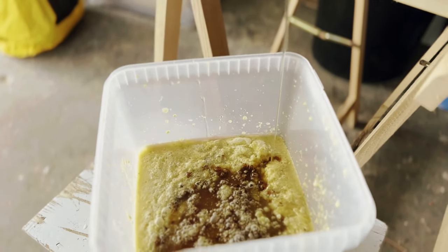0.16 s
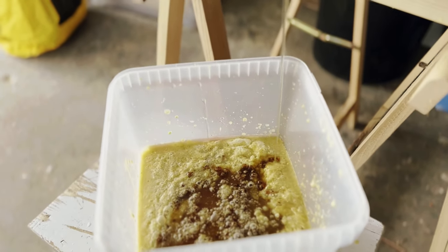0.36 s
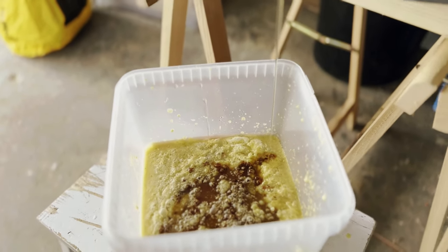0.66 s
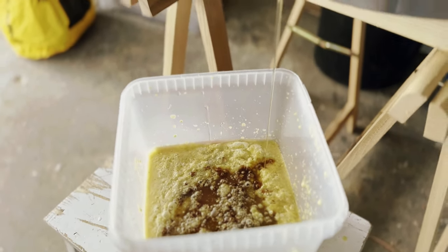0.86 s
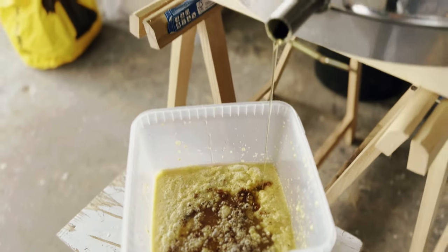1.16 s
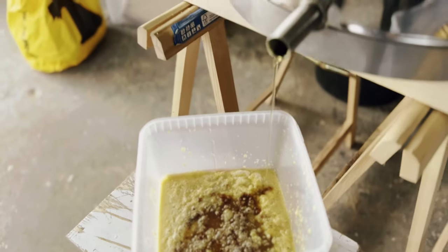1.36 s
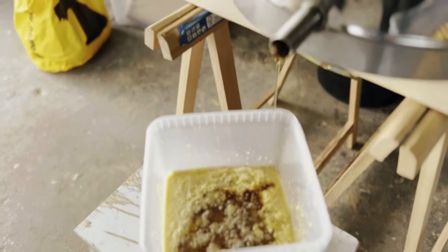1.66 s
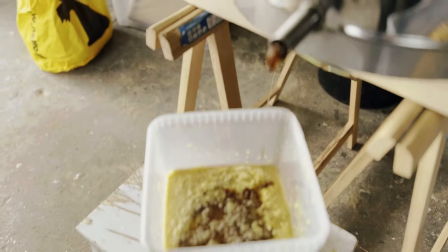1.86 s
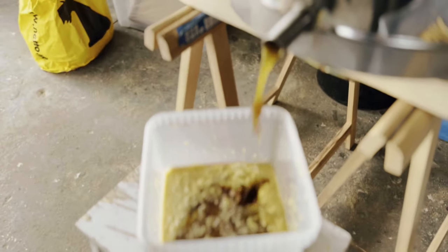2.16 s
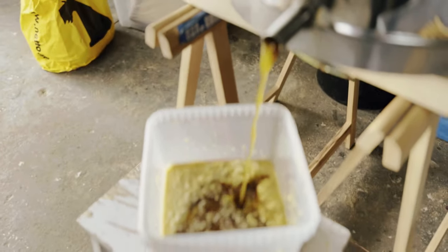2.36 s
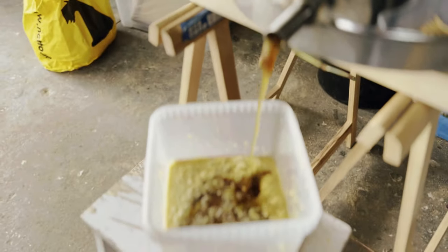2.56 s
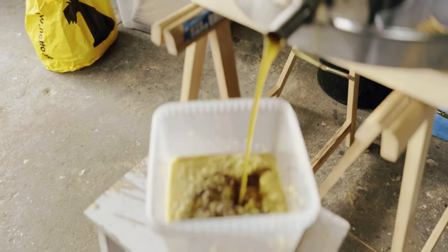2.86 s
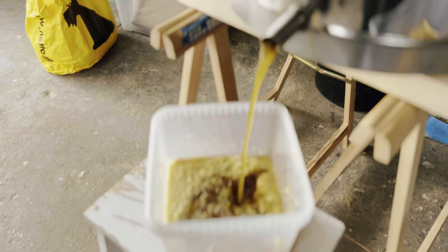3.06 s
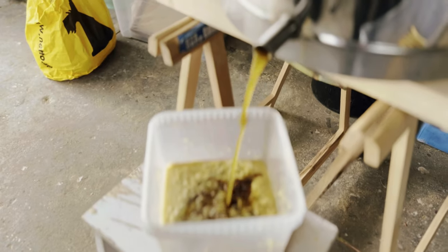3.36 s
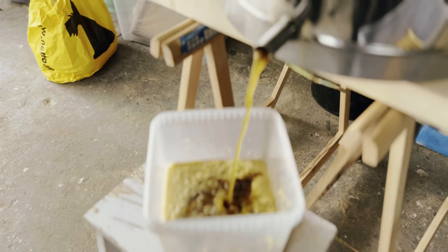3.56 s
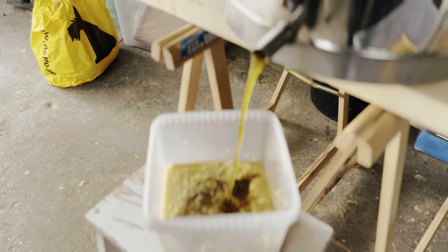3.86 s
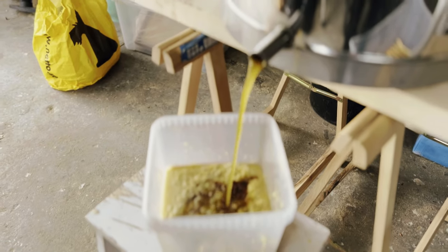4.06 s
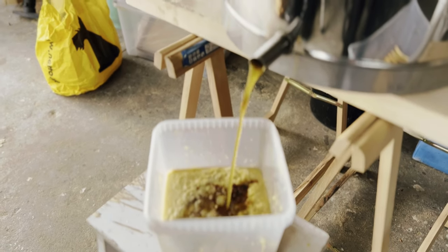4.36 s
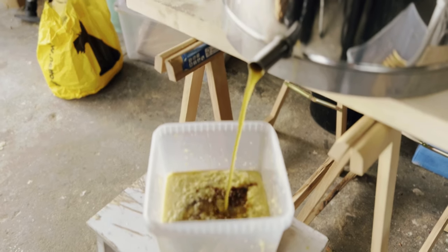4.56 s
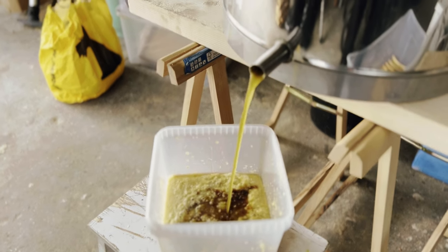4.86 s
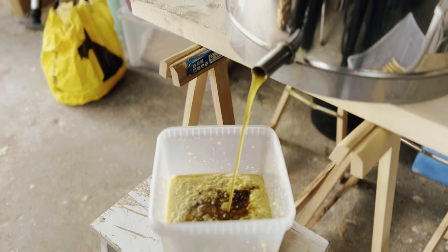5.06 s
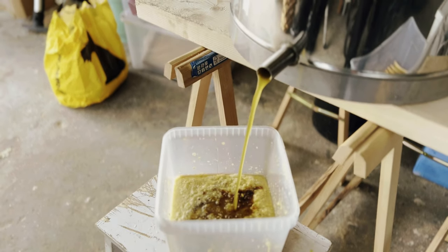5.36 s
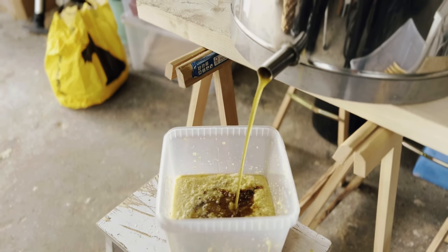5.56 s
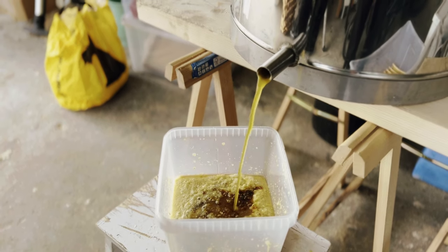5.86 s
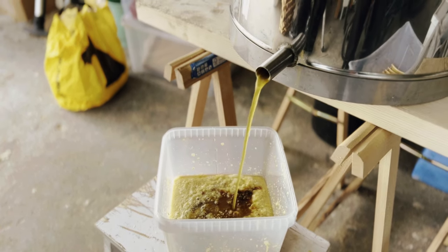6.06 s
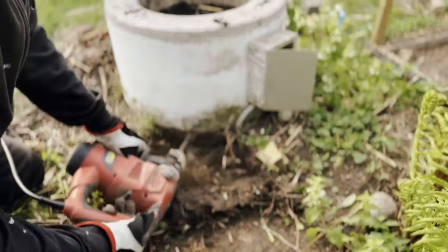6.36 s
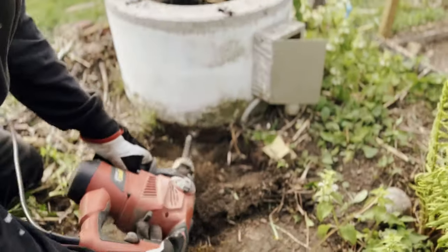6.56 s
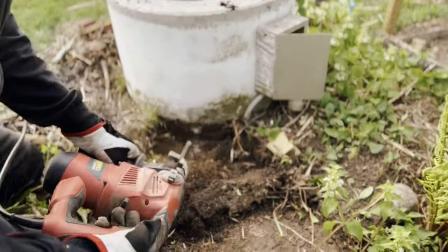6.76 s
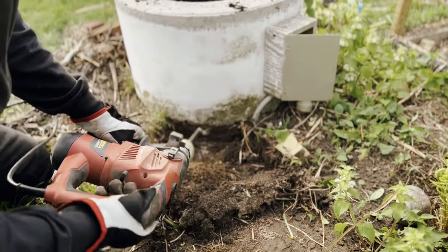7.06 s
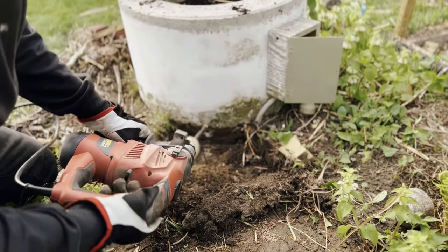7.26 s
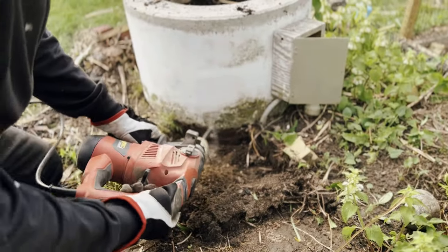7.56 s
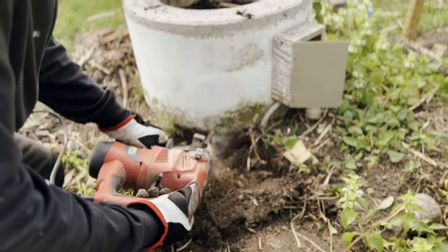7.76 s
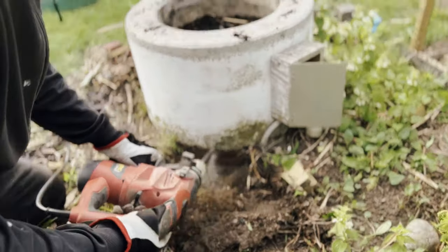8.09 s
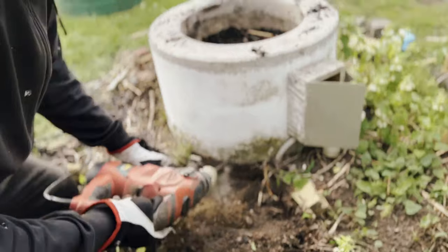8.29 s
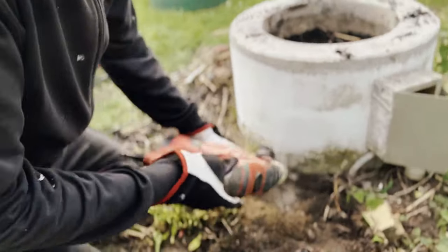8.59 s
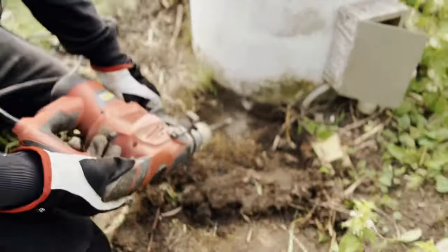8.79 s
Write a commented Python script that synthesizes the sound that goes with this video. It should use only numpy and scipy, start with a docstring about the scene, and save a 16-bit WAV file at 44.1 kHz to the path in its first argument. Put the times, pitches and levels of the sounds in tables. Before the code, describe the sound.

For the first 6.3 seconds a quiet workshop is heard closely, with faint low room air. A sleeve brushes softly at about 0.3 s and fades. A few tiny bubble pops come near 1.1 s; soft, dull low bumps fall between 1.5 and 2.4 s, strongest near 2.1. From about 2.3 s thick honey plops into a plastic tub: irregular hollow gulps, bright snaps, little sprays and fine fizz, with a short squelch at 2.9, busiest until 4.7, then sparser. At 6.33 s an abrupt cut to a garden: a loud electric hammer, already at speed, coasts down with falling whine and rushing air. At 7.4 s it spins up fast; from 7.45 rapid blows thud, clank and ring, starting with one hard bite at 7.5, heaviest near 8, lighter around 8.5. Released at about 8.6 s, hammering drops out and the motor whirs downward.

```python
"""Thick honey runs from a spout into a plastic tub in a quiet workshop: decaying tones for gulps and snaps,
filtered noise for spray, random rung pulses for fizz. A sleeve rustles; soft low bumps over room air.
At 6.33 s, abruptly, a garden: a corded electric hammer coasts down, spins up, chisels at the foot of a
concrete ring for a second and is let go. One shaft speed drives its air noise, hum, whine and blows."""
import sys
import numpy as np
from scipy import signal
from scipy.fft import rfft, irfft, next_fast_len
from scipy.io import wavfile
from scipy.ndimage import uniform_filter1d

SR = 44100
rng = np.random.default_rng(int(sys.argv[2]) if len(sys.argv) > 2 else 0)


def dump_mix(stems):
    """Bounce the given channels to the path in sys.argv[1] as a 16-bit WAV at rate SR."""
    frames = np.atleast_2d(stems).T  # one column per channel
    limited = np.clip(frames, -1, 1)  # hard clip at full scale
    pcm = np.round(limited * 32767).astype(np.int16)
    wavfile.write(sys.argv[1], SR, pcm)


N = 393813
TIME = np.arange(N) / SR
GARDEN_START_S = 6.33
BAND_EDGE_HZ = 15900

# Loudest bursting bubbles. Each row: start in seconds, gulp in Hz, gulp level in dB, snap in Hz,
# snap level in dB, spray level in dB before a common trim.
BUBBLES = [(1.0653, 478, -47.5, 1220, -56, -60), (1.1075, 654, -42.5, 1250, -47.5, -53),
           (1.1465, 667, -44, 1220, -48, -66), (2.0683, 580, -50, 1800, -50.5, -80),
           (2.154, 580, -54, 1250, -50, -50.5), (2.22, 480, -56, 1270, -42.5, -54),
           (2.3396, 400, -63, 1920, -46.5, -42), (2.3607, 590, -34.5, 3970, -48, -50),
           (2.375, 588, -39.5, 3680, -50, -60), (2.4284, 536, -35, 1800, -54, -45),
           (2.4593, 480, -43, 1230, -53, -65), (2.4942, 610, -52, 3830, -35, -58),
           (2.5038, 593, -32.5, 1220, -42, -49), (2.5335, 556, -43, 3640, -54, -66),
           (2.6413, 590, -60, 3730, -38.5, -52), (2.7238, 547, -38, 3870, -67, -55),
           (2.751, 585, -36.5, 2820, -43.5, -46), (2.8041, 775, -35.5, 3000, -39.5, -51),
           (2.8188, 580, -25.5, 1170, -41, -41), (2.837, 460, -39.5, 1320, -56, -51),
           (2.927, 584, -44, 2900, -47, -54), (2.956, 490, -33, 1360, -48, -56),
           (3.0591, 467, -45, 2900, -48, -70), (3.123, 480, -41.5, 1340, -65, -72),
           (3.1761, 474, -39, 4050, -39.5, -46.5), (3.2599, 480, -35.5, 4130, -52, -44.5),
           (3.3026, 500, -45, 5640, -60, -43.5), (3.325, 596, -46, 1750, -46.5, -67),
           (3.344, 493, -40.5, 3970, -40, -48), (3.413, 630, -39.5, 2650, -49.5, -65),
           (3.4795, 605, -31.5, 1190, -47, -42), (3.576, 550, -36.5, 1200, -34.5, -75),
           (3.5974, 470, -57, 5050, -36, -50), (3.701, 503, -32, 5330, -47, -64),
           (3.7405, 580, -42, 2900, -38.5, -62), (3.885, 548, -41, 3070, -62, -60),
           (4.0087, 780, -53, 5340, -41.5, -62), (4.1964, 720, -45, 2540, -45, -73),
           (4.228, 560, -60, 5000, -50, -46), (4.3015, 497, -43.5, 5450, -38.5, -47),
           (4.4531, 500, -38.5, 5740, -34.5, -40.5), (4.519, 550, -51, 4000, -45.5, -53),
           (4.5568, 620, -40.5, 6400, -38.5, -45), (4.6904, 720, -38.5, 2920, -47, -42),
           (4.7151, 497, -52, 2900, -44.5, -64), (4.8596, 580, -43, 1780, -42.5, -80),
           (5.2476, 480, -60, 3860, -47, -56), (5.302, 606, -40.5, 4150, -40.5, -55),
           (5.4303, 582, -37, 4020, -49, -47.5), (5.8494, 576, -43, 3830, -44, -48.5),
           (5.9535, 470, -43.5, 6340, -37, -47.5), (6.0117, 484, -38.5, 5270, -45, -68),
           (6.158, 463, -44.5, 4000, -47.5, -58), (6.289, 570, -36.5, 1305, -65, -70)]
# Liveliness of the stream. Each row: time in seconds, level of the tiny bursts in dB.
FIZZ_LEVEL = [(0.3, -80), (0.8, -68), (2.15, -68.5), (2.4, -54), (3.1, -60.5), (4.65, -59.5), (5.0, -71),
              (5.7, -71.5), (5.95, -61), (6.3, -68)]
# Colour of a bursting film. Each row: frequency in Hz, relative level in dB.
SPRAY_COLOUR = [(300, -16), (1200, -6), (3000, 1.5), (6500, 1.5), (8000, -2.5), (10500, 7.5), (12500, -3),
                (15000, -3), (16500, 17)]
# Short squelch of froth: centre in seconds, half-length in seconds, level in dB.
SQUELCH = (2.905, 0.035, -42.5)
# Colour of the froth. Each row: frequency in Hz, relative level in dB.
FROTH_COLOUR = [(250, -15), (550, 2), (950, -6), (1500, -14), (3000, -8), (5000, -14), (12000, -26)]

# Driven stretches of the motor. Each row: start in seconds (the first is already at top speed),
# release in seconds, top speed in shaft turns per second.
DRIVEN_STRETCHES = [(6.33, 6.378, 416.5), (7.4, 8.593, 401)]
# Motor time constants; fan drag relative to bearing friction; reference speed.
SPIN_UP_S, COAST_S, FAN_DRAG = 0.161, 1.389, 0.36
FULL_TURNS_PER_S = 400
# First colour of the rush. Each row: frequency in Hz, relative level in dB per Hz.
FIRST_RUSH_COLOUR = [(40, -28), (90, -11.5), (220, -19.5), (440, -3.5), (830, -7), (1200, -8), (2100, -9),
                     (2700, -4.5), (3800, -8), (5300, -4), (7400, -5), (10400, -8), (12000, -10.5),
                     (16000, -15)]
# Fuller colour of the rush. Each row: frequency in Hz, relative level in dB per Hz.
FULLER_RUSH_COLOUR = [(40, -27), (100, -12), (250, -2.5), (450, 0), (950, 1), (1300, 3.5), (2200, -4.5),
                      (3000, 2), (4300, -1), (6300, -1), (8000, -2.5), (10000, -3), (12000, -9),
                      (16000, -17)]
# Housing resonances. Each row: frequency in Hz, width in Hz, lift in dB.
HOUSING_MODES = [(1250, 300, 4.5), (1804, 190, 6), (2900, 1050, 5), (4970, 1000, 2.5), (6480, 470, 3),
                 (7180, 370, -3)]
# The arm passes in front of the tool and shades its rush. Each row: time in seconds, gain in dB.
ARM_SHADE = [(8.27, 0), (8.47, -2.5), (8.68, -3), (8.78, 0.4)]
# Fan whine apart from its rise with speed. Each row: time in seconds, relative level in dB.
WHINE_LEVEL = [(6.55, 0), (6.63, -8), (6.76, 1), (6.84, -13), (6.91, 0), (7.5, -8.5), (7.57, -14),
               (7.63, -1.5), (8.0, 4), (8.11, 2), (8.14, -7), (8.46, -4), (8.52, -18.5), (8.62, -5)]
# Striker: engages in seconds, drops out in seconds.
HAMMER_SPAN_S = (7.44, 8.665)
# How hard the chisel is pressed home. Each row: time in seconds, pressure from 0 to 1.
CHISEL_PRESSURE = [(7.44, 0.46), (7.7, 0.62), (7.8, 0.84), (7.97, 0.95), (8.08, 0.45), (8.35, 0.57),
                   (8.5, 0), (8.62, 0), (8.75, 0.4)]
# Colour of the thud. Each row: frequency in Hz, relative level in dB.
THUD_COLOUR = [(30, -28), (115, -11.5), (230, 0), (330, -7.5), (450, 11), (520, 8), (580, 2), (680, 6),
               (740, -1.5), (795, 6), (880, -3), (1300, -13), (3000, -24), (8000, -29)]
# Steel on steel inside the tool. Each row: frequency in Hz, relative level in dB.
CLANK_COLOUR = [(300, -21), (900, -4.5), (1500, -6), (2200, 0), (3000, 5), (4200, 0.5), (6400, 2.5),
                (9000, -7), (16000, -2.5)]
# Modes of the chisel steel. Each row: frequency in Hz, width in Hz, relative level in dB.
CHISEL_MODES = [(13400, 400, 0), (14000, 900, -15), (10400, 1100, -5)]
# Body shake at 1 to 5 times the blow rate: relative levels in dB.
SHAKE_HARMONICS_DB = [-8.5, -4, -2, -2, -5]
# One hard blow as the chisel seats.
BITE_S, BITE_DB, BITE_DECAY_S = 7.516, -10.5, 0.0023

# Sleeve brush: start in seconds, attack in seconds, decay in seconds, level in dB.
SLEEVE = (0.33, 0.06, 0.35, -62)
# Colour of the cloth. Each row: frequency in Hz, relative level in dB.
CLOTH_COLOUR = [(500, -14), (2500, -5), (4000, 2.5), (6500, 1), (9000, -3), (11000, -22), (16000, -28)]
# Workshop reverberation. Each row: frequency in Hz, 60 dB decay time in seconds.
ROOM_T60 = [(200, 0.37), (600, 0.23), (2500, 0.13), (6000, 0.22), (9000, 0.15), (15000, 0.23)]
# Soft low bumps. Each row: centre in seconds, level in dB, Gaussian width in seconds.
BUMPS = [(1.522, -50, 0.039), (1.836, -46.5, .04), (1.93, -58, .04), (2.07, -36.5, 0.012),
         (2.16, -47, 0.044), (2.317, -42, 0.023), (2.395, -50, .03)]
# Colour of the bumps. Each row: frequency in Hz, relative level in dB.
BUMP_COLOUR = [(20, -12), (45, 4), (100, 1), (170, -11), (300, -34), (1000, -73)]
# Colour of the room air. Each row: frequency in Hz, relative level in dB.
AIR_COLOUR = [(15, -43), (28, -20), (58, 2), (92, -11.5), (157, -6.5), (250, -4.5), (400, -14), (900, -13),
              (2500, -29.5), (4200, -36), (6400, -32), (8000, -47), (11000, -56), (16000, -59)]
AIR_DB = -50.5


def amp(db):
    """Decibels to gain."""
    return 10 ** (np.asarray(db) / 20)


def unit(x):
    """Scales to rms 1."""
    return x / np.sqrt(np.mean(x ** 2) + 1e-20)


def read(points, hz):
    """Interpolates a spectrum table on a log-frequency axis."""
    f, value = np.transpose(points)
    return np.interp(np.log(hz + 1), np.log(f + 1), value)


def curve(rows):
    """Interpolates a two-column time table at every sample."""
    s, value = np.transpose(rows)
    return np.interp(TIME, s, value)


def add(mix, s, sound):
    """Mixes a sound in at time s."""
    part = mix[max(round(s * SR), 0):][:len(sound)]
    part += sound[:len(part)]


def shaped_noise(gain_at):
    """Gaussian noise with gain_at(Hz) as its spectrum, rms 1."""
    size = next_fast_len(N)
    spectrum = rfft(rng.standard_normal(size))
    spectrum *= gain_at(np.fft.rfftfreq(size, 1 / SR))
    return unit(irfft(spectrum, size)[:N])


def noise(colour):
    """Steady noise with a spectrum table, rms 1."""
    return shaped_noise(lambda hz: amp(read(colour, hz)))


def wander(limit_hz):
    """Slow random drift up to about limit_hz, rms 1."""
    return shaped_noise(lambda hz: 1 / (1 + (hz / limit_hz) ** 2))


def tint(x, colour, size=4096):
    """Minimum-phase filter with a spectrum table: attacks stay sharp."""
    log_gain = np.log(amp(read(colour, abs(np.fft.fftfreq(size, 1 / SR)))))
    response = np.exp(np.conj(signal.hilbert(log_gain)))
    taps = np.fft.ifft(response).real[:size // 2]
    return signal.oaconvolve(x, taps)[:N]


def ring(x, hz, width_hz):
    """One damped mode that keeps the power of a white input."""
    r = np.exp(-np.pi * width_hz / SR)
    pole = r * np.exp(2j * np.pi * hz / SR)
    return signal.lfilter([np.sqrt(2 * (1 - r * r))], [1, -pole], x).real


def bubbles(gulp_s=0.0074, rise_s=0.00042, sag=0.099, snap_s=0.003, chirp=0.21,
            spray_s=0.0027, grit=0.71, tear_s=0.0005, spray_trim_db=-1):
    """Each film bursts with a spray and a rising snap; the air pocket under it rings, sagging in pitch."""
    t = np.arange(SR // 12) / SR
    tones, spray = np.zeros(N), np.zeros(N)

    def sized(v, db):  # rms level over the first 10 ms
        return amp(db) * v / np.sqrt(np.mean(v[:SR // 100] ** 2))

    gulp_decay, snap_decay = np.exp(-t / gulp_s), np.exp(-t / snap_s)
    gulp_rise, tear = 1 - np.exp(-t / rise_s), 1 - np.exp(-t / tear_s)
    spray_decay = np.exp(-t / spray_s) + 0.07 * np.exp(-t / 0.011)
    for s, gulp_hz, gulp_db, snap_hz, snap_db, spray_db in BUBBLES:
        film, drops = rng.standard_normal((2, len(t)))
        gulp_turns = np.cumsum(gulp_hz * (1 + sag * (2 * gulp_decay - 1))) / SR
        gulp = np.sin(2 * np.pi * gulp_turns) * gulp_decay * gulp_rise
        snap_turns = np.cumsum(snap_hz * (1 + chirp * (.5 - snap_decay))) / SR  # the hole widens
        gritty = grit * ring(film, snap_hz, 0.34 * snap_hz)
        snap = tear * snap_decay * (np.sin(2 * np.pi * snap_turns) + gritty)
        add(tones, s, sized(gulp, gulp_db) + sized(snap, snap_db))
        add(spray, s, sized(tear * drops * spray_decay, spray_db + spray_trim_db))
    tone_colour = [(100, -13), (350, 0.0), (6800, -2.0), (9000, -46), (16000, -24)]
    return tint(tones, tone_colour) + tint(spray, SPRAY_COLOUR)


def fizz(ticks_per_s=130, spread_db=6.0, gulps_per_s=30, gulps_db=4, pitches=14):
    """Small bubbles ring at random pitches, as loud as the stream is lively; once the froth squelches."""
    def bursts(per_s, lo_hz, hi_hz, damping):
        size = amp(spread_db * np.minimum(rng.exponential(1, N), 3))
        size *= rng.random(N) < per_s / SR
        kind = rng.integers(0, pitches, N)
        bank = enumerate(np.geomspace(lo_hz, hi_hz, pitches))
        return unit(sum(ring(size * (kind == k), hz, damping * hz) for k, hz in bank))

    gulp_colour = [(150, 3), (400, 3), (900, 3), (2500, -7.5)]
    gulps = tint(bursts(gulps_per_s, 456, 754, 0.093), gulp_colour)
    ticks = unit(tint(bursts(ticks_per_s, 1800, 10000, .13), SPRAY_COLOUR))
    centre_s, half_s, squelch_db = SQUELCH
    swell = np.exp(-((TIME - centre_s) / half_s) ** 4)
    squelch = amp(squelch_db) * swell * unit(tint(bursts(900, 590, 4550, 0.076), FROTH_COLOUR))
    return amp(curve(FIZZ_LEVEL)) * (ticks + amp(gulps_db) * gulps) + squelch


def shaft_speed():
    """Turns per second: torque falls as the motor gains speed; released, friction and the fan brake it."""
    speed = np.full(N, float(DRIVEN_STRETCHES[0][2]))
    for start_s, release_s, top in DRIVEN_STRETCHES:
        on, off = round(start_s * SR), round(release_s * SR)
        lag = np.exp(-TIME[:N - on] / SPIN_UP_S)
        speed[on:] = np.cbrt(top ** 3 + (speed[on] ** 3 - top ** 3) * lag)
        left = np.exp(-TIME[:N - off] / COAST_S)
        speed[off:] = speed[off] * left / (1 + FAN_DRAG * (1 - left))
    return speed


def running_level(speed, full_db=-21.5, speed_power=1.69):
    """Gain of gear and air noise: a power of the speed, shaded by the arm."""
    return amp(full_db + curve(ARM_SHADE)) * (speed / FULL_TURNS_PER_S) ** speed_power


def blow_level(speed, loose_db, pressed_db, speed_power, engage_s=0.033):
    """Gain of one part of the blows: grows with speed, moves from loose to pressed level."""
    start_s, stop_s = HAMMER_SPAN_S
    engaged = np.clip(np.minimum(TIME - start_s, stop_s - TIME) / engage_s + .5, 0, 1)
    level_db = loose_db + (pressed_db - loose_db) * curve(CHISEL_PRESSURE)
    return engaged * amp(level_db) * (speed / FULL_TURNS_PER_S) ** speed_power


def hammer(speed, turns, thud_db=1.5, return_db=3.5, idle_db=-9, idle_s=0.0013, crack_s=.0028,
           return_lag=.65, ring_s=0.0017, return_s=0.0024, uneven_db=1.4, turns_per_blow=7):
    """A geared striker hits the chisel and rattles on its way back; disengaged, it only rattles."""
    strokes = (turns - np.interp(BITE_S, TIME, turns)) / turns_per_blow  # a blow lands on the bite
    # pressed home, the chisel thuds and is damped; held loosely, it rings and shakes the body
    thud_level = blow_level(speed, loose_db=-37.5, pressed_db=-29.5, speed_power=1.5)
    ring_level = blow_level(speed, loose_db=-29.5, pressed_db=-42, speed_power=0.33)
    shake_level = blow_level(speed, loose_db=-43, pressed_db=-44.5, speed_power=3.4)
    active = slice(*(int(s * SR) for s in HAMMER_SPAN_S))

    def even(v):  # rms 1 while the striker is engaged
        return v / np.sqrt(np.mean(v[active] ** 2))

    def hits(lag, spread_db):
        clicks = np.diff(np.floor(strokes - lag), prepend=0).clip(0, 1)
        return clicks * amp(spread_db * rng.standard_normal(N).clip(-2, 2))

    def burst(clicks, decay_s):
        return signal.lfilter([1], [1, -np.exp(-1 / (decay_s * SR))], clicks)

    def clank(clicks, decay_s):
        return even(burst(clicks, decay_s) * noise(CLANK_COLOUR))

    blows, returns = hits(0, uneven_db), hits(return_lag, 2.6)
    thud = amp(thud_db) * even(tint(blows, THUD_COLOUR))
    crack = clank(blows, crack_s)
    rattle = amp(return_db) * clank(returns, return_s)
    idle = amp(idle_db) * running_level(speed) * clank(blows, idle_s)
    scrape = burst(blows, ring_s) * rng.standard_normal(N)
    steel = even(sum(amp(db) * ring(scrape, hz, width_hz) for hz, width_hz, db in CHISEL_MODES))
    shake = np.sqrt(2) * sum(amp(db) * np.sin(2 * np.pi * k * strokes)
                             for k, db in enumerate(SHAKE_HARMONICS_DB, start=1))
    bite_decay = (TIME > BITE_S) * np.exp(-abs(TIME - BITE_S) / BITE_DECAY_S)
    bite = amp(BITE_DB) * bite_decay * noise(CLANK_COLOUR)
    return thud_level * (thud + crack + rattle) + ring_level * steel + shake_level * shake + idle + bite


def rush(speed, turns, level_db=-1, dull_db_per_octave=16, patch_db=2.88, chatter=0.099,
         flicker_db=1.03, build_s=1.15, relax_s=0.25):
    """Gears and cooling air sound through the housing; the treble fades as the shaft slows."""
    hz, t, z = signal.stft(rng.standard_normal(N), SR, nperseg=1024, noverlap=768)
    pace = np.interp(t, TIME, speed)
    # the rush drifts from its first colour to a fuller one, then back
    drift_start_s, drift_back_s, _ = DRIVEN_STRETCHES[-1]
    fuller = np.clip((t - drift_start_s) / build_s, 0, 1)
    fuller *= np.exp(-np.maximum(t - drift_back_s, 0) / relax_s)
    colour_db = np.outer(read(FIRST_RUSH_COLOUR, hz), 1 - fuller)
    colour_db += np.outer(read(FULLER_RUSH_COLOUR, hz), fuller)
    for mode_hz, width_hz, lift_db in HOUSING_MODES:
        colour_db += (lift_db / (1 + ((hz - mode_hz) / width_hz * 2) ** 2))[:, None]
    # turbulence falls away above the pitch of the fan blades, more so at low speed
    octaves_above = np.clip(np.log2((hz[:, None] + 1) / (28 * pace)), 0, 1.1)
    colour_db -= dull_db_per_octave * octaves_above * (1 - pace / 480)
    # narrow resonances come and go as the tool shifts in the hands
    across_hz = uniform_filter1d(rng.standard_normal(z.shape), size=3, axis=0)
    patches = unit(uniform_filter1d(across_hz, size=24, axis=1))
    gain = amp(colour_db + patch_db * np.tanh(patches))
    band = (hz > 900) & (hz < 8000)
    gain /= np.sqrt((gain[band] ** 2).sum(0) / len(hz))  # even power in this band
    air = signal.istft(z * gain, SR, nperseg=1024, noverlap=768)[1][:N]
    flicker = amp(level_db + flicker_db * wander(130))
    return air * running_level(speed) * flicker * (1 + chatter * np.cos(2 * np.pi * turns))


def motor_tones(speed, turns, hum_db=-32.5, hum_power=3.47, labour_db=4, whine_db=-25, whine_power=2.3,
                skirt_db=-9, jitter_rad=0.2, fade_db=4.5, blades=27):
    """The shaft hums once a turn, the fan whines once a blade with a fuzzy skirt; both grow with speed."""
    pace = speed / FULL_TURNS_PER_S
    shaft = amp(hum_db + 0.75 * wander(25)) * pace ** hum_power * np.sin(2 * np.pi * turns)
    shaft *= amp(labour_db * (curve(CHISEL_PRESSURE) - .5))  # labours while the chisel is pressed home
    blade = 2 * np.pi * blades * turns
    waver_db = 0.67 * wander(40) + fade_db * abs(1 - pace) * wander(9.9)  # unsteady at low speed
    clean = amp(waver_db) * np.sin(blade + jitter_rad * wander(60))
    fuzz = wander(330) * np.sin(blade) + wander(220) * np.cos(blade)
    skirt = amp(skirt_db) * fuzz / np.sqrt(2)
    whine = amp(whine_db + curve(WHINE_LEVEL)) * pace ** whine_power * (clean + skirt)
    return np.sqrt(2) * (shaft + whine)


def sleeve(grain_db=3.0):
    """The rustle of cloth swells and fades, catching unevenly."""
    start_s, attack_s, decay_s, db = SLEEVE
    age = np.maximum(TIME - start_s, 0)
    swell = np.minimum(age / attack_s, 1) * np.exp(-np.maximum(age - attack_s, 0) / decay_s)
    return amp(db + grain_db * wander(50)) * swell * noise(CLOTH_COLOUR)


def workshop(x, wet_db=-8):
    """Scattered reflections, each band dying at its own speed."""
    size = SR // 2
    taps = rng.standard_normal(size) * (rng.random(size) < .08)
    taps *= np.arange(size) > SR // 200  # none in the first 5 ms
    hz, t, z = signal.stft(taps, SR, nperseg=256)
    tail_colour = [(200, 7), (600, 1.5), (2500, 5.5), (4500, 1.0), (6200, 11.0), (8000, -2.0), (15000, 6.0)]
    decay_db = read(tail_colour, hz)[:, None] - 60 * t / read(ROOM_T60, hz)[:, None]
    tail = signal.istft(z * amp(decay_db), SR, nperseg=256)[1]
    return x + amp(wet_db) * signal.oaconvolve(x, tail / np.linalg.norm(tail))[:N]


def room_air(waver_db=1.0):
    """Steady noise of the room air, its level wavering slightly."""
    return amp(AIR_DB + waver_db * wander(32)) * noise(AIR_COLOUR)


def soft_bumps():
    """Low noise under short Gaussian swells."""
    swells = sum(amp(db) * np.exp(-.5 * ((TIME - s) / width_s) ** 2) for s, db, width_s in BUMPS)
    return swells * noise(BUMP_COLOUR)


def scene():
    """The workshop, then the garden."""
    indoors = workshop(bubbles() + fizz()) + sleeve() + room_air() + soft_bumps()
    speed = shaft_speed()
    turns = np.cumsum(speed) / SR
    garden = hammer(speed, turns) + rush(speed, turns) + motor_tones(speed, turns)
    return np.where(TIME < GARDEN_START_S, indoors, garden)[None]


def record(dry):
    """Band limit: a linear-phase low-pass."""
    lowpass = signal.firwin(401, BAND_EDGE_HZ, window=("kaiser", 8), fs=SR)
    return signal.oaconvolve(dry, lowpass[None], "same")


dry = scene()
out = record(dry)
dump_mix(out)
```